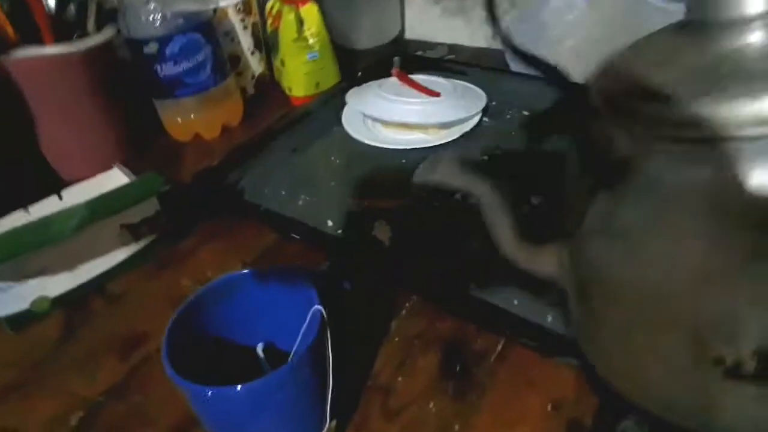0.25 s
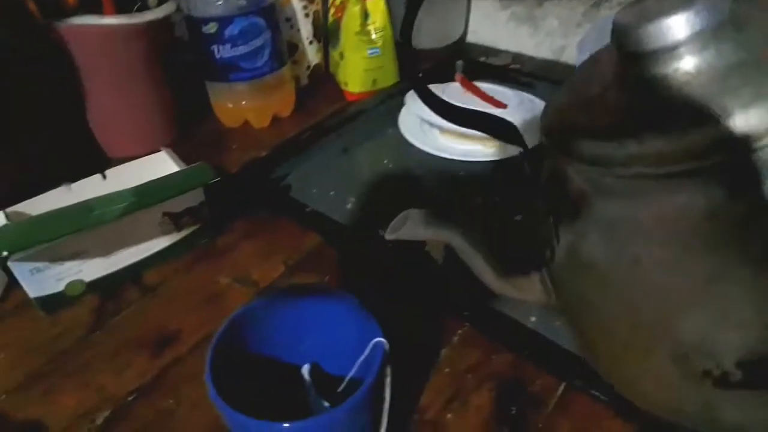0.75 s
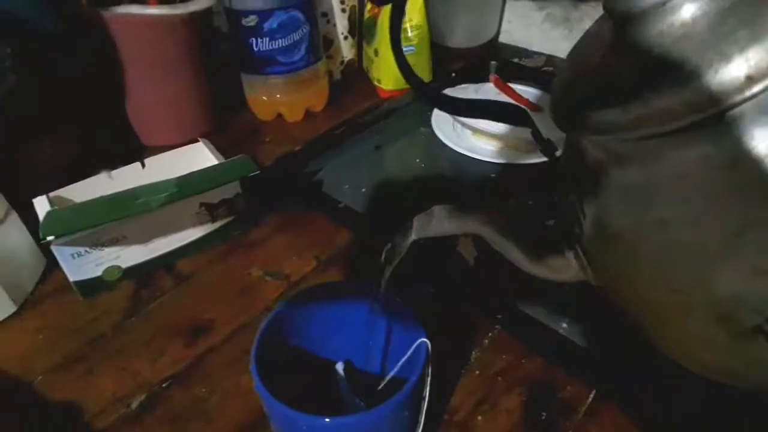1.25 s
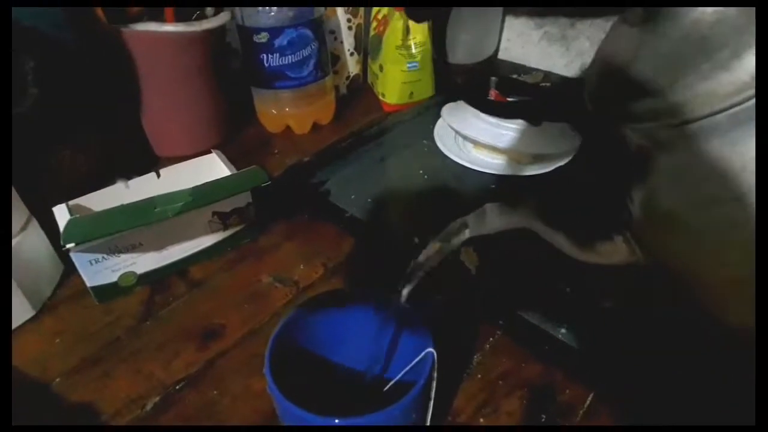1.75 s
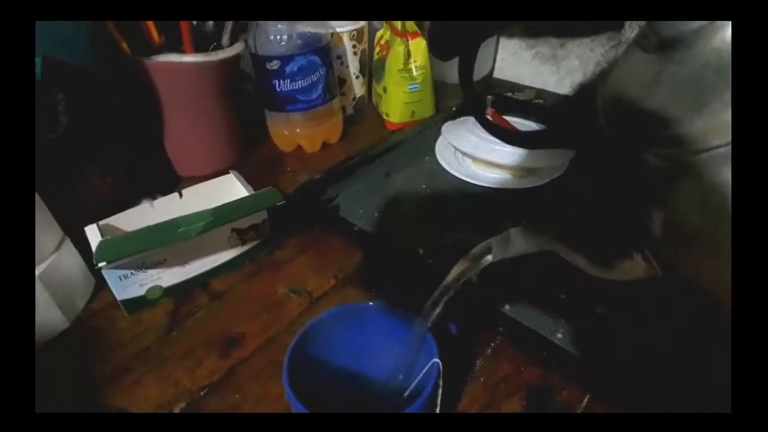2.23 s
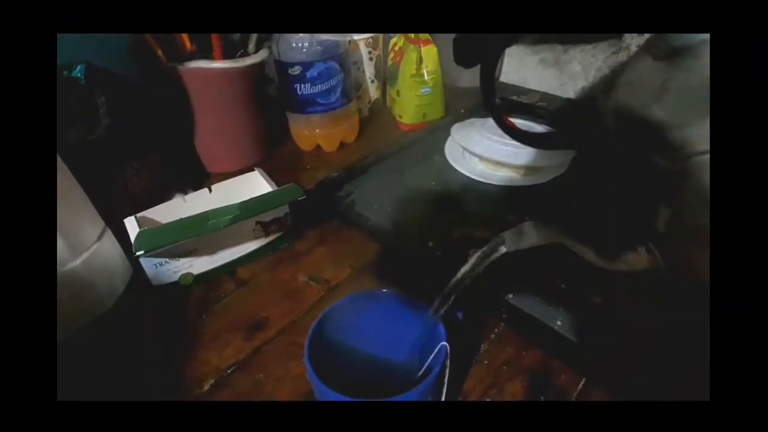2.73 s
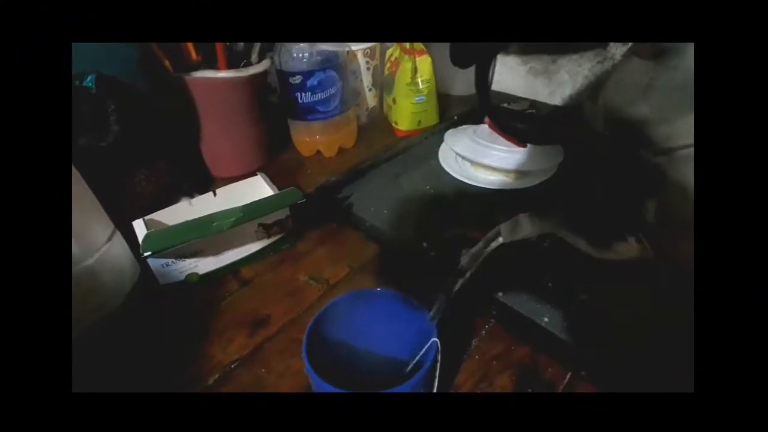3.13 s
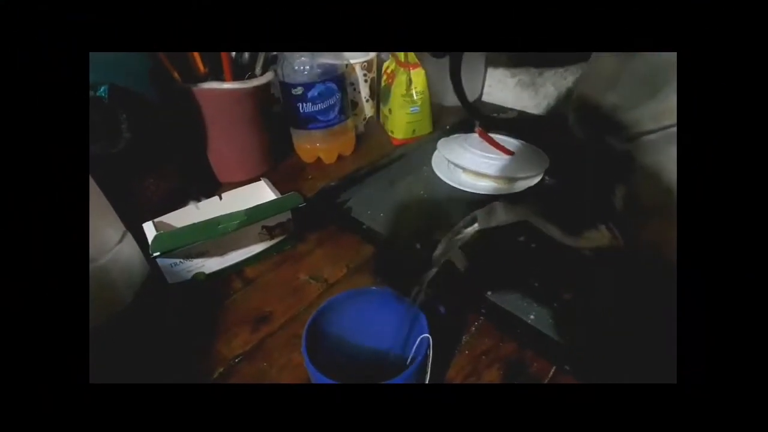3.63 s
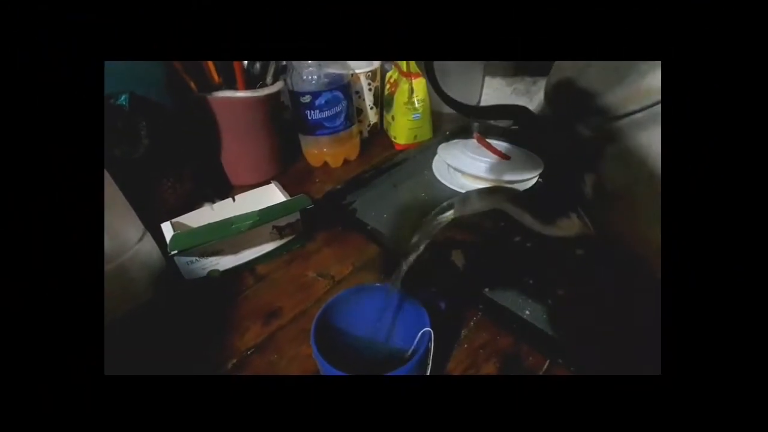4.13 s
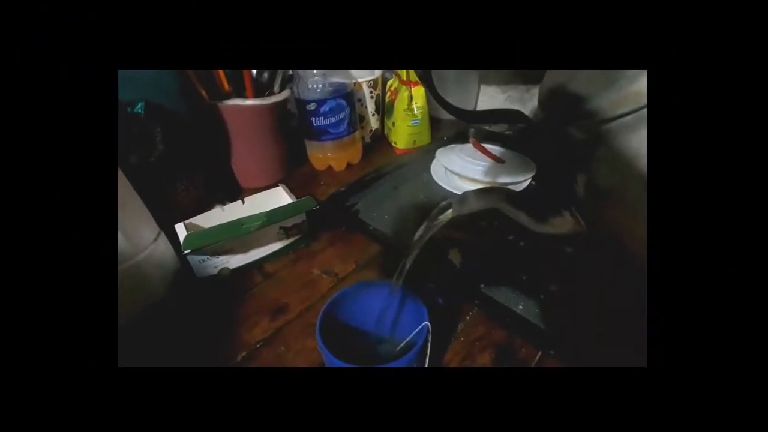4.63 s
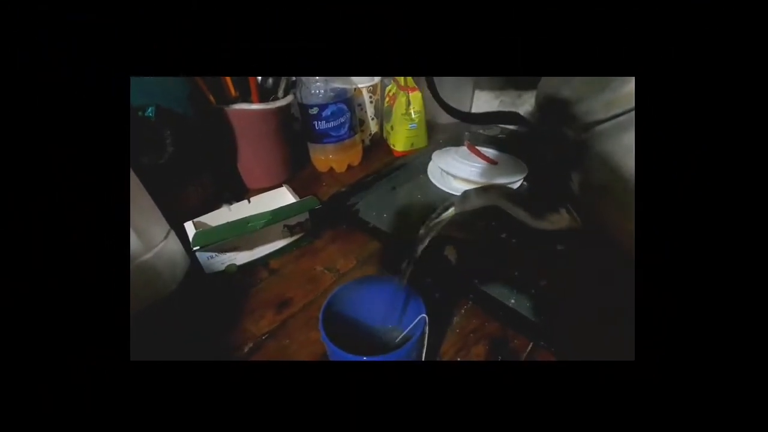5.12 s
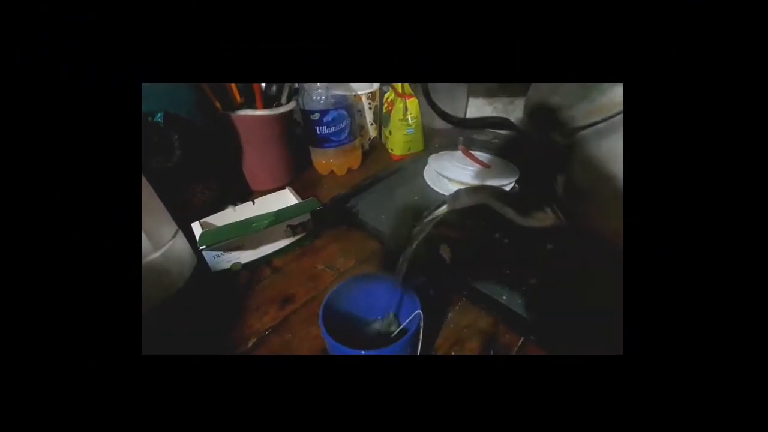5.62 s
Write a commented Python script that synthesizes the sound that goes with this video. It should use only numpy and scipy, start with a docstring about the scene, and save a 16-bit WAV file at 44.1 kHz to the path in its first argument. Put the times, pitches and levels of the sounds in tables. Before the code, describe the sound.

In a small kitchen, a muffled wash of rain and a fine water hiss run throughout. A metal kettle's handle and lid clink in a quick cluster around one second, with one dull body knock. Later stray drops tick, and a bird gives one hoarse chirp near four seconds. Close mono microphone, short room echo.

```python
"""Small kitchen: hot water runs softly from a metal kettle into a mug, over the steady wash of rain outside.
Rain and pour are shaped noise with a patter of impacts; under them lies a faint, wavering low drone.
The kettle knocks once and its handle and lid clink as it is lifted and tipped: metal noise and dying modes.
Stray drops tick as short noise bursts, some narrow and some broad; later a bird gives one hoarse,
arched chirp of frayed harmonics. One microphone feeds both channels."""
import sys
import numpy as np
from scipy import signal
from scipy.fft import rfft, irfft
from scipy.io import wavfile
from scipy.ndimage import uniform_filter1d

SR = 44100
rng = np.random.default_rng(int(sys.argv[2]) if len(sys.argv) > 2 else 0)


def generate_wav(sig):
    """Save sig (samples, or channels by samples) to the path in sys.argv[1] as 16-bit PCM at SR."""
    pcm = np.round(np.clip(np.atleast_2d(sig).T, -1, 1) * 32767).astype(np.int16)
    wavfile.write(sys.argv[1], SR, pcm)


N = 258867
TIME_S = np.arange(N) / SR


def gain_of(db):
    """Amplitude factor of a level in dB."""
    return 10 ** (np.asarray(db) / 20)


def evened(x):
    """Scales x to unit RMS."""
    return x / np.sqrt(np.mean(x ** 2) + 1e-20)


def read(points, hz):
    """Curve of (f/Hz, value) points joined by straight lines over log frequency."""
    f, value = np.transpose(points)
    return np.interp(np.log(hz + 1), np.log(f + 1), value)


def coloured(x, spectrum, tilt_db_per_octave=0):
    """Filters x by a spectrum, tilted about 5 kHz between 2 and 10 kHz."""
    hz = np.fft.rfftfreq(len(x), 1 / SR)
    octaves = np.log2(np.clip(hz, 2000, 10000) / 5000)
    gain = gain_of(read(spectrum, hz) + tilt_db_per_octave * octaves)
    return irfft(rfft(x) * gain, len(x))


def wander(size, hz):
    """Smooth random signal of unit RMS, up to about hz."""
    f = np.fft.rfftfreq(size, 1 / SR)
    lowpass = np.exp(-(f / hz) ** 2)
    return evened(irfft(rfft(rng.standard_normal(size)) * lowpass, size))


def complex_wander(size, hz):
    """Smooth random phasor: wavers in both strength and phase."""
    return wander(size, hz) + 1j * wander(size, hz)


def bump(t, centre, half):
    """Smooth rise and fall of height 1."""
    return np.exp(-((t - centre) / half) ** 2 / 2)


def add(mix, start_s, sound):
    """Adds sound into mix in place, cut at the end of mix."""
    part = mix[round(start_s * SR):][:len(sound)]
    part += sound[:len(part)]


def patter(per_s, spread_db):
    """Train of one-sample impacts at random times, a few of them larger."""
    size = gain_of(spread_db * np.minimum(rng.exponential(1, N), 4))
    sign = rng.choice([-1, 1], N)
    hit = rng.random(N) < per_s / SR
    return evened(size * sign * hit)


# reverberation time of the room: (f/Hz, t60/s)
ROOM_DECAY = [(200, 0.23), (2500, 0.32), (7000, 0.31), (15000, 0.13)]


def kitchen(x):
    """Dense reflections off near walls, each band dying at its own speed."""
    taps = rng.standard_normal(SR // 2) * (rng.random(SR // 2) < 3000 / SR)  # 3000 per s
    taps[:SR // 300] = 0  # gap before the first reflection
    hz, t, bands = signal.stft(taps, SR, nperseg=256)
    decay = gain_of(-60 * t / read(ROOM_DECAY, hz)[:, None])
    tail = signal.istft(bands * decay, SR, nperseg=256)[1]
    return signal.fftconvolve(x, tail / np.linalg.norm(tail))[:N]


# slow drift of the wash, scaled up for the hiss: (t/s, level/dB)
EASING = [(.4, 0), (1.2, -1), (2.1, -.8), (3.55, -1.8), (4.5, -0.8)]


def easing_db():
    """Slow drift that rain and hiss share."""
    return np.interp(TIME_S, *np.transpose(EASING))


# rain outside, relative spectrum: (f/Hz, level/dB per Hz)
RAIN_SPECTRUM = [(25, -55), (45, -31), (65, -12.5), (85, -6), (130, -4), (235, -2), (300, -7.5), (410, -7),
                 (520, -4.5), (570, -0.7), (800, 0), (1650, -0.7), (2200, -4), (3100, -12.5), (4500, -26),
                 (16000, -51)]


def rain(base_db=-35, patchy_db=0.79, near_db=-7):
    """Countless far drops merge to a wash that drifts in patches; nearer drops patter in it."""
    drops_noise = rng.standard_normal(N) + gain_of(near_db) * patter(per_s=900, spread_db=3.5)
    z = signal.stft(drops_noise, nperseg=1024, noverlap=768)[2]
    # random levels smoothed over frequency, then time
    patches = uniform_filter1d(rng.standard_normal(z.shape), size=12, axis=0)
    patches = evened(uniform_filter1d(patches, size=16, axis=1))
    wash = signal.istft(z * gain_of(patchy_db * patches), nperseg=1024, noverlap=768)[1][:N]
    return gain_of(base_db + easing_db()) * evened(coloured(wash, RAIN_SPECTRUM))


def hum(centre_hz=141.9, level_db=-55, width_hz=9):
    """Faint low drone: a carrier that wavers in pitch and strength."""
    carrier = np.exp(2j * np.pi * centre_hz * TIME_S)
    drone = (complex_wander(N, width_hz) * carrier).real
    return gain_of(level_db) * evened(drone)


# chirp: starts low, breaks upward to a held note, then sags
CHIRP_S, BREAK_S, SAG_S, CHIRP_END_S = 3.8, 3.866, 4.088, 4.168
LOW_HZ, TOP_HZ, GLIDE_S, SAG_HZ_PER_S = 1765, 2190, 0.044, 4900
START_DB, GROW_DB_PER_S, ATTACK_S, RELEASE_S = -34.1, 4.5, 0.04, 0.043
BREAK_DIP_DB, DIP_LAG_S, DIP_HALF_S = -6.5, 0.023, 0.02
# hoarseness 0-1; FRAY_S: time for the sag to add 1
HOARSE_START, HOARSE_HELD, FRAY_S = 0.6, 0.42, 0.04


def chirp_gesture(t):
    """Pitch, effort and hoarseness: the call clears as it climbs and frays as it sags."""
    climb = 1 - np.exp(-np.maximum(t - BREAK_S, 0) / GLIDE_S)
    sagging_s = np.maximum(t - SAG_S, 0)
    hz = LOW_HZ + (TOP_HZ - LOW_HZ) * climb - SAG_HZ_PER_S * sagging_s
    hoarse = HOARSE_START + (HOARSE_HELD - HOARSE_START) * climb + sagging_s / FRAY_S
    attack, release = (t - CHIRP_S) / ATTACK_S, (CHIRP_END_S - t) / RELEASE_S
    gate = np.clip(np.minimum(attack, release), 0, 1)
    # the voice thins at the break
    dip_db = BREAK_DIP_DB * bump(t, BREAK_S + DIP_LAG_S, DIP_HALF_S)
    effort_db = START_DB + GROW_DB_PER_S * (t - CHIRP_S) + dip_db
    return hz, gate * gain_of(effort_db), np.clip(hoarse, 0, 1)


# bird's throat, relative response: (f/Hz, level/dB)
THROAT_SPECTRUM = [(1950, -13), (2170, -6), (2800, -6), (3500, -0.5), (4400, -2), (5000, -10), (5600, -8),
                   (6600, -16), (7300, -4.5), (8800, -18), (9600, -25), (11000, -23), (13000, -38)]


def bird(jitter=0.0257, quaver=0.007, rasp_hz=210, air_db=-13, quaver_db=1.0):
    """Reedy stack of harmonics; hoarseness frays each into a noise band, most at start and end."""
    t = np.arange(CHIRP_S, CHIRP_END_S, 1 / SR)
    hz, effort, hoarse = chirp_gesture(t)
    # relative pitch deviation
    unsteady = jitter * hoarse * wander(len(t), hz=450) + quaver * wander(len(t), hz=40)
    turns = np.cumsum(hz * (1 + unsteady)) / SR
    drive = gain_of(air_db) * hoarse * rng.standard_normal(len(t))
    clear = np.sqrt(1 - hoarse ** 2)
    for k in range(1, 7):
        fray = complex_wander(len(t), rasp_hz * k)  # higher harmonics fray more widely
        harmonic = np.exp(2j * np.pi * k * turns)
        drive = drive + ((clear + hoarse * fray) * harmonic).real
    voice = evened(coloured(drive, THROAT_SPECTRUM))
    out = np.zeros(N)
    add(out, CHIRP_S, effort * gain_of(quaver_db * wander(len(t), hz=40)) * voice)
    return out


def ring(modes, t, tilt_db_per_octave=0):
    """Dying modes, each started at a random phase."""
    hz, db, t60_s = np.transpose(modes)[:, :, None]
    tilt_db = tilt_db_per_octave * np.log2(hz / hz.mean())
    size = gain_of(db + tilt_db - 60 * t / t60_s)
    phase_turns = rng.random(hz.shape)
    return (size * np.sin(2 * np.pi * (hz * t + phase_turns))).sum(0)


# handle and lid clinks: (t/s, level/dB before trim, brightness/dB per octave, favoured f/Hz)
CLINKS = [(.1327, -36.5, -12, 5200), (0.5226, -31, -1, 6940), (0.7174, -26.5, -6, 3900),
          (0.7493, -34, -15, 4000), (0.824, -29, 4, 7100), (.8496, -31.5, -5, 5500), (0.8904, -23, 1, 5600),
          (.9152, -15, -2.5, 3500), (.9325, -30, -2, 3500), (0.9456, -22.3, 1, 7000),
          (.9590, -15.7, 1, 6050), (.999, -31, -2, 4100), (1.1567, -20, -0.3, 4250),
          (1.167, -36, -10, 3100), (1.231, -31.5, -3, 4100)]
# metal contact, relative spectrum: (f/Hz, level/dB per Hz)
CLASH_SPECTRUM = [(1000, -36), (2500, -15), (3100, -3.5), (4100, -1.5), (4700, -6), (5400, 0), (7000, -4.5),
                  (8700, -8.5), (9500, -22), (11500, -18.5), (16000, -29)]
# kettle modes before tilt: (f/Hz, level/dB, t60/s)
KETTLE_MODES = [(2940, -11, .07), (3100, 0, 0.042), (3410, -5.5, 0.077), (3570, -10, .04), (4035, -9, .1),
                (4970, -14, 0.041), (5570, -4, 0.046), (5800, -18, 0.043), (6030, -11, 0.054),
                (6700, -6, 0.043), (6910, -7, .06), (6800, -7, .06), (7480, -10, .06), (8060, -7, 0.057),
                (9000, -5.5, 0.017)]


def clinks(clash_t60_s=0.037, rise_s=0.00032, ring_db=-9, favour_db=6.5, favour_hz=300, trim_db=-0.5):
    """Each clink is a short clash of metal that leaves the kettle ringing."""
    out, t = np.zeros(N), np.arange(SR // 3) / SR
    hz = np.fft.rfftfreq(len(t), 1 / SR)
    rise = 1 - np.exp(-t / rise_s)
    for start_s, db, tilt, spot_hz in CLINKS:
        # the struck spot favours one range of pitches
        spot = gain_of(favour_db * np.exp(-((hz - spot_hz) / favour_hz) ** 2))
        contact = irfft(rfft(rng.standard_normal(len(t))) * spot, len(t))
        clash = evened(coloured(contact, CLASH_SPECTRUM, tilt)) * gain_of(-60 * t / clash_t60_s)
        ringing = gain_of(ring_db) * ring(KETTLE_MODES, t, tilt)
        add(out, start_s, gain_of(db + trim_db) * rise * (clash + ringing))
    return out


# dull knock of the body, one event: (t/s, level/dB)
KNOCK = (.788, -28.3)
# body modes: (f/Hz, level/dB, t60/s)
BODY_MODES = [(302, -1.5, 0.15), (345, -4, 0.24), (370, -5, .25), (965, -10, 0.07), (1140, -5, .06)]


def knock(rise_s=0.0015):
    """One dull blow sets the low modes of the kettle's body ringing."""
    out, t = np.zeros(N), np.arange(SR // 3) / SR
    start_s, db = KNOCK
    rise = 1 - np.exp(-t / rise_s)
    add(out, start_s, gain_of(db) * rise * ring(BODY_MODES, t))
    return out


# stray drops of the pour: (t/s, onset level/dB, f/Hz, width/Hz)
DROPS = [(2.3038, -35, 8050, 9000), (2.323, -44, 9000, 8000), (2.6011, -35, 6800, 700),
         (3.519, -29, 5400, 3200), (3.583, -38, 8000, 5000), (3.986, -29.5, 6700, 2500),
         (4.5796, -30.5, 7300, 1100), (4.712, -44, 11000, 5000)]


def drops(t60_s=0.014):
    """Stray drops tick: short dying noise bursts, narrow or broad, each around its own pitch."""
    out, t = np.zeros(N), np.arange(SR // 16) / SR
    for start_s, db, hz, width_hz in DROPS:
        splash = evened(wander(len(t), width_hz / 2) * np.cos(2 * np.pi * hz * t))
        add(out, start_s, gain_of(db - 60 * t / t60_s) * splash)
    return out


# fine hiss of water, relative spectrum: (f/Hz, level/dB per Hz)
HISS_SPECTRUM = [(1500, -8), (3200, 0.5), (5000, -0.5), (7000, 1), (8600, -1.5), (9400, -10),
                 (10800, -10.5), (13000, -13.5), (16000, -14.5)]
# brief swells of the hiss: (t/s, peak level/dB, half length/s, brightness/dB per octave)
SWELLS = [(.35, -45.5, .06, -7), (2.178, -40.3, 0.034, -1), (4.766, -51, 0.018, 0)]
# swells, relative spectrum before tilt: (f/Hz, level/dB per Hz)
SWELL_SPECTRUM = [(2500, -16), (5000, -4), (7200, 3), (8600, -2), (9600, -9.5), (12500, -8), (16000, -15)]


def hiss(base_db=-43.2, db_per_easing_db=1.44, spray_db=-4, flutter_db=0.9):
    """Fine splashes and bursting bubbles make a hiss, which now and then swells briefly."""
    spray = rng.standard_normal(N) + gain_of(spray_db) * patter(per_s=1500, spread_db=1.0)
    level_db = base_db + db_per_easing_db * easing_db() + flutter_db * wander(N, hz=25)
    out = gain_of(level_db) * evened(coloured(spray, HISS_SPECTRUM))
    t = np.arange(-SR // 4, SR // 4) / SR
    for centre_s, db, half_s, tilt in SWELLS:
        mist = evened(coloured(rng.standard_normal(len(t)), SWELL_SPECTRUM, tilt))
        add(out, centre_s + t[0], gain_of(db) * bump(t, 0, half_s) * mist)
    return out


def scene():
    """Kettle and mug are close; the bird is farther off and more echoing."""
    near, far = clinks() + knock() + drops(), bird()
    echoes = kitchen(gain_of(-11) * near + gain_of(-5) * far)
    mono = rain() + hum() + far + near + hiss() + echoes
    return np.array([mono, mono])


def record(dry, edge_hz=15500):
    """The recorder's band limit: a linear-phase low-pass."""
    lowpass = signal.firwin(511, edge_hz, window=("kaiser", 9), fs=SR)
    return signal.oaconvolve(dry, lowpass[None], "same")


dry = scene()
out = record(dry)
generate_wav(out)
```